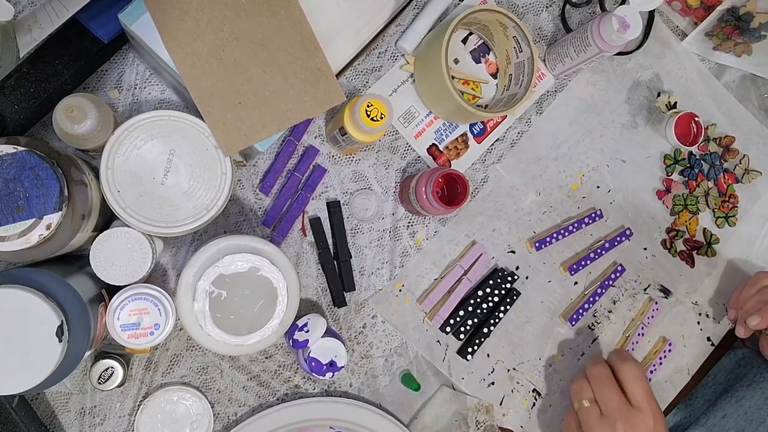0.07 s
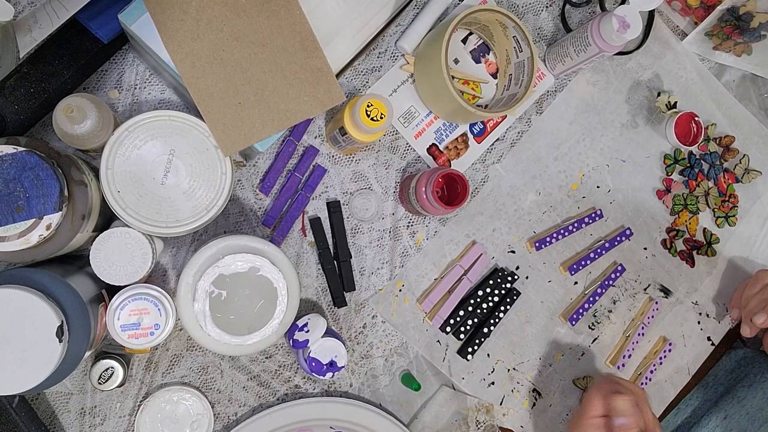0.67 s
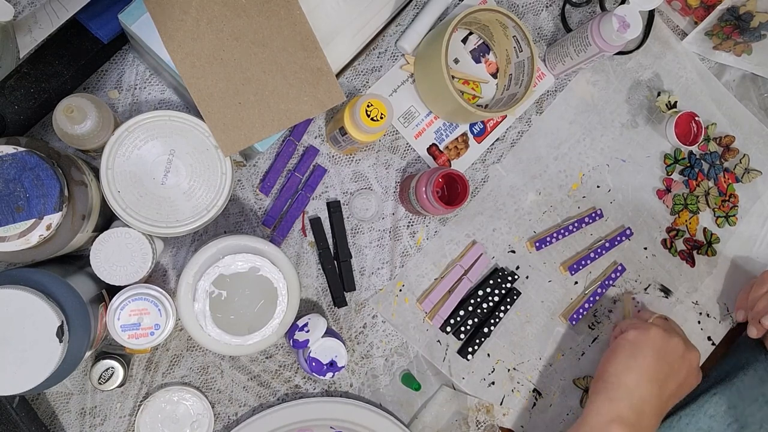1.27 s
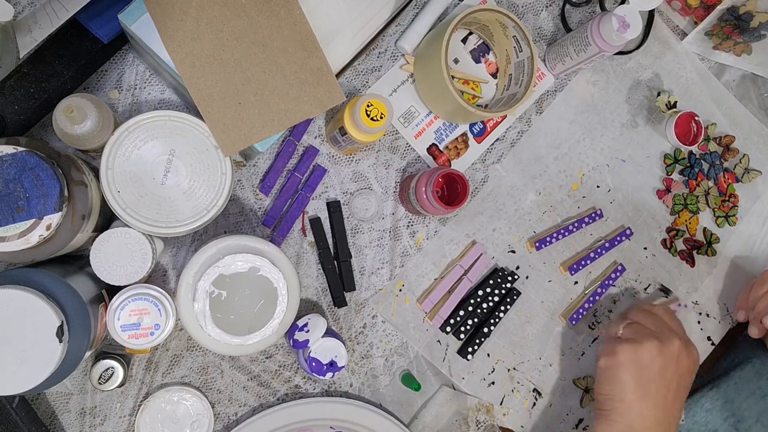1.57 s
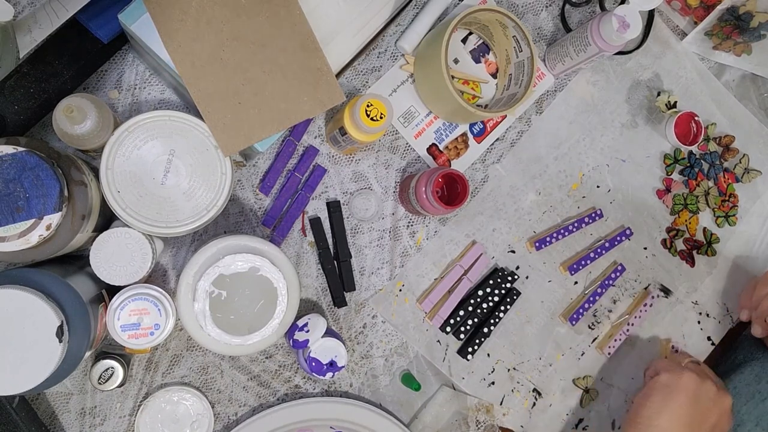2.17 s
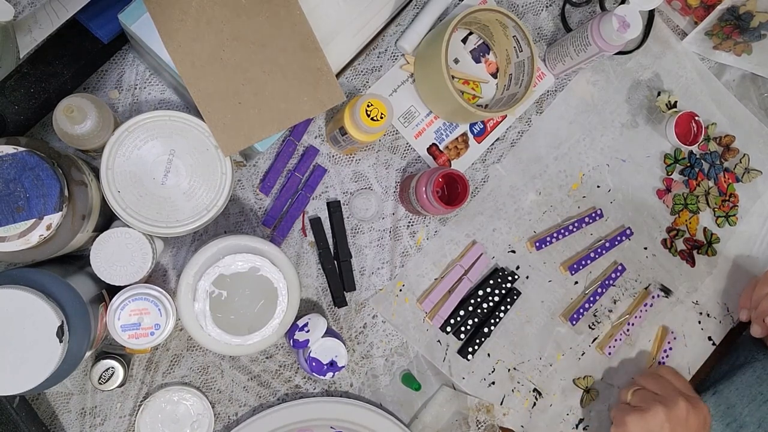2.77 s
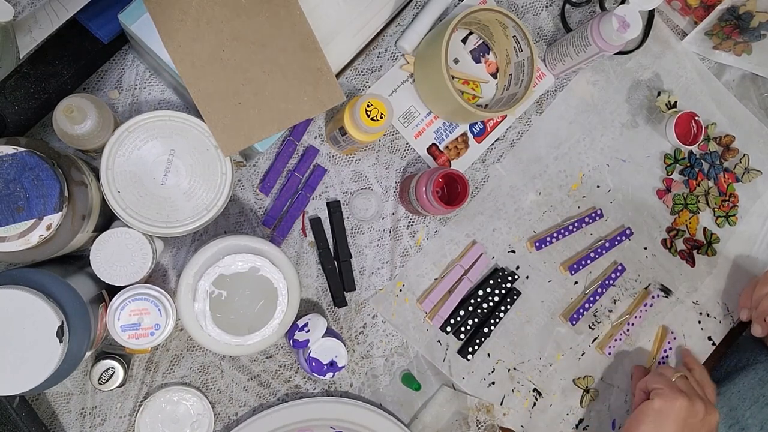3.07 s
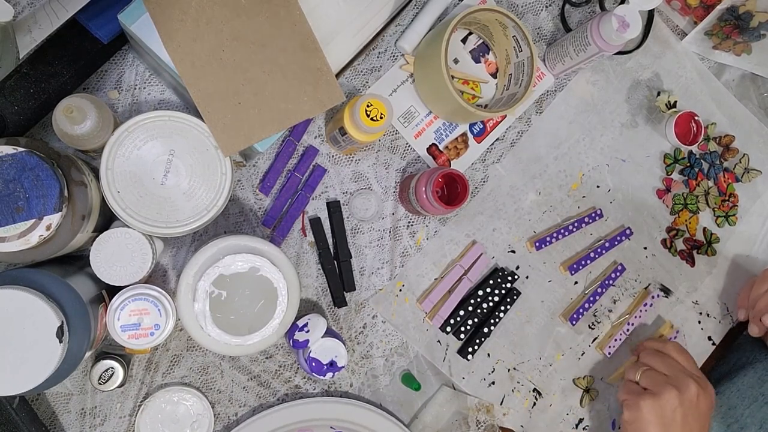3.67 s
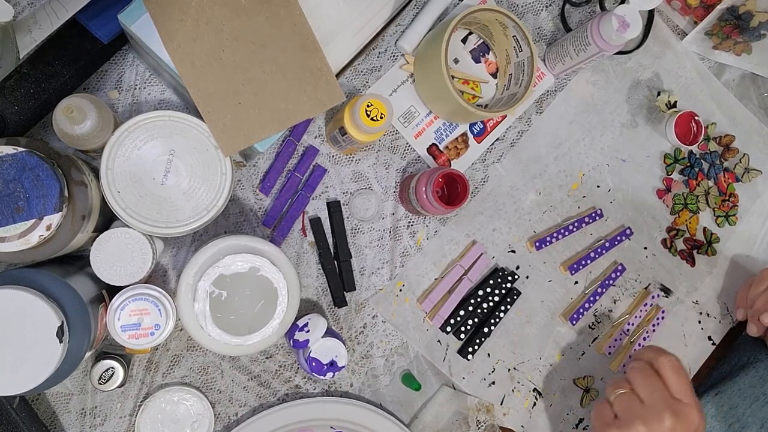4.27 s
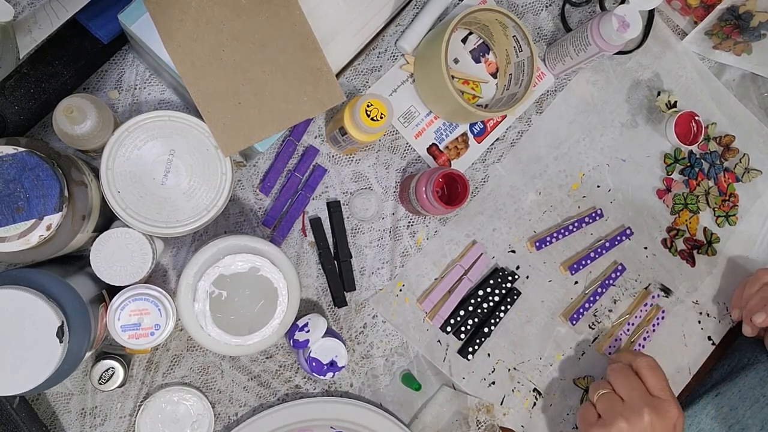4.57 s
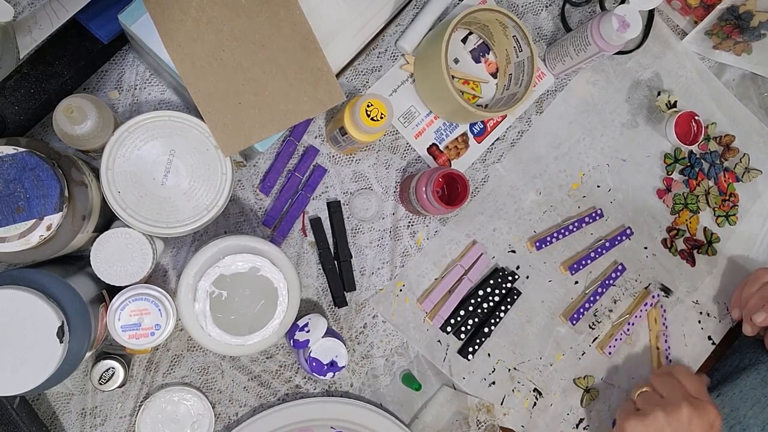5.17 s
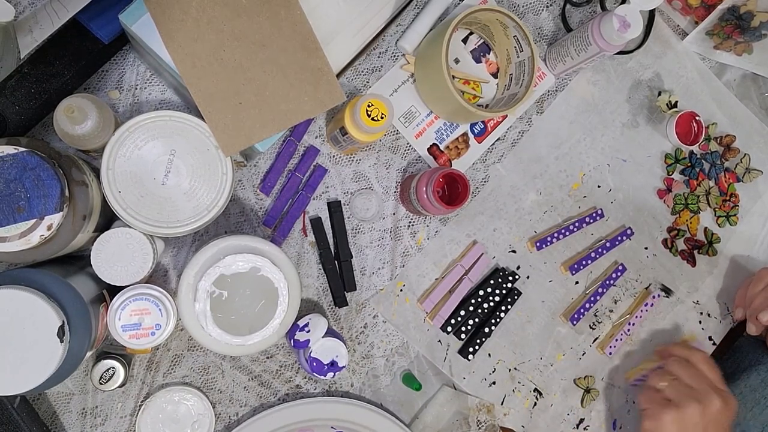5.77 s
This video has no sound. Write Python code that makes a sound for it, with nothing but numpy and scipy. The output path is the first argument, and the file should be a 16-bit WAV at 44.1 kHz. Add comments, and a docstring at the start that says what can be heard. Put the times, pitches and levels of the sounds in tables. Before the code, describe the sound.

Wooden clothespins click and slide on paper over a low hum, while a door further off knocks and then latches shut.

```python
"""A wooden clothespin slides over paper and clicks down on a craft table, above a small room's mains hum.
Friction makes the hiss of pins and fingertips, impact makes the clicks, and a hand bumps the table top.
Further off a door shudders, knocks against its frame and later shuts with a latch, each blow exciting
damped modes of the wood. Something squeals faintly, perhaps a far dog."""
import sys
import numpy as np
from scipy import signal
from scipy.fft import rfft, irfft, next_fast_len
from scipy.io import wavfile
from scipy.ndimage import uniform_filter1d, map_coordinates

SR = 44100
rng = np.random.default_rng(int(sys.argv[2]) if len(sys.argv) > 2 else 0)


def persist_wave(psi):
    """Save psi, clipped to +-1, as 16-bit WAV."""
    counts = np.round(np.clip(psi, -1, 1) * 32767).astype(np.int16)
    wavfile.write(sys.argv[1], SR, np.atleast_2d(counts).T)


N = 264820

# The room's diffuse field. Each row: frequency in Hz, left-right coherence.
COHERENCE = [(60, 0.82), (130, 0.64), (300, 0.78), (640, 0.38), (1400, 0.073), (3100, 0.033), (15000, 0.03)]
# Reverberation time. Each row: frequency in Hz, t60 in seconds.
ROOM_T60 = [(100, 0.57), (250, 0.54), (600, 0.46), (2000, 0.33), (6000, 0.28), (14000, 0.38)]

# Spectral envelopes of the sources. Each row: frequency in Hz, gain in dB.
AIR_SPECTRUM = [(20, -15), (50, 1), (75, -2.5), (105, -1.5), (160, -18), (250, -15), (480, -17), (900, -20),
                (1500, -24.5), (1900, -22), (2300, -26.5), (3800, -27.5), (4800, -36.5), (7400, -33.5),
                (8800, -47.5), (15500, -41.5)]
SQUEAL_SPECTRUM = [(300, -31), (480, 10.5), (700, -1.5), (950, 8.5), (1300, -2.5), (1520, 2.5),
                   (1800, -15.5), (2000, -14), (2800, -14), (4000, -39)]
HINGE_SPECTRUM = [(2000, -32), (3000, -3), (3400, 2), (4100, -4), (5200, -18), (7000, -38)]
DOOR_SPECTRUM = [(76, -24), (130, 0), (180, -9), (250, 1), (350, -1.5), (420, -7.5), (500, -4), (700, -8.5),
                 (1160, -11), (1900, -16), (4120, -30), (5900, -32), (9000, -52.5), (15000, -67)]
WOOD_SPECTRUM = [(50, -17), (110, 1.5), (200, -2), (270, 5.5), (520, 6), (720, -2.5), (1100, -6),
                 (1650, -7.5), (2100, -13), (3000, -20.5), (4000, -22.5), (5000, -26), (7500, -34.5),
                 (15000, -50.5)]  # door frame and table top
SKIN_SPECTRUM = [(300, -7), (800, -3), (1200, -15), (1750, 5), (2400, -15), (3300, -12), (5000, -38)]
PAPER_SPECTRUM = [(880, -41), (1500, -20), (1790, -15.5), (2160, -18), (3360, -9), (3630, -19.5),
                  (3960, -3), (4680, -16.5), (5120, -5.5), (5650, -1.5), (7140, -0.5), (9130, -15.5),
                  (12600, -7), (15100, -10), (15700, -11)]
PIN_SPECTRUM = [(300, -34), (1200, -14), (2800, -7.5), (3900, -0.5), (4700, -10), (5700, -4.5), (7400, 0),
                (8800, -18.5), (12500, -5.5), (15700, -15)]

# Normal modes of the wood. Each row: frequency in Hz, relative level in dB, t60 in seconds.
DOOR_LEAF_MODES = [(240, -6, 0.23), (316, 0, 0.22), (370, -6, 0.27), (490.5, 3.5, 0.35), (567, -7, 0.24),
                   (813, -20, 0.33), (907, -11, 0.27), (1144, -4.5, 0.2), (1258, -33, .2)]
FRAME_MODES = [(70, -4, .45), (240, -11, .45), (275, -9, .4), (348, -4, .36), (405, -8, .35), (567, 1, .4),
               (826, -2, .22), (1185, -8, .18), (1306, -4, .17), (1475, -13, .25), (1820, -9, .13),
               (1950, -9, .13), (2063, -9, .14), (2480, -18, .18)]
TABLE_TOP_MODES = [(284.4, 5.5, 0.14), (331, 0, 0.36), (520, -20, 0.12), (920, -22, 0.37), (1960, -11, .12)]

# Sustained sounds. Each row: start in seconds, length in seconds, level in dB.
LOW_RUMBLES = [(1.25, 0.038, -57), (1.38, 0.084, -53.5), (1.69, 0.16, -56.5)]  # brief low rumbles as a hand presses on the table
DOOR_SHUDDERS = [(1.606, .12, -49.5), (1.725, 0.045, -45), (1.812, 0.063, -43), (1.915, 0.061, -47)]
HINGE_RASPS = [(2.47, 0.022, -64.5), (2.61, 0.1, -80)]
FINGER_RUBS = [(4.36, 0.17, -80.5), (4.58, 0.39, -89.5)]

# Blows on wood. Each row: time in seconds, level in dB, then low, middle and treble in dB relative to it.
DOOR_KNOCKS = [(1.615, -43, -25.5, -25, -24), (1.742, -44.5, -7, -21, -36),
               (1.811, -46.5, -9.5, -23.5, -26), (2.174, -20.5, -14.5, -20, -24),
               (2.41, -35.5, -11, -21.5, -29.5), (2.51, -39.5, -10, -22, -31)]
HAND_BUMPS = [(4.487, -52, -8.5, -18.5, -38), (5.483, -62.5, -0.5, -16.5, -31)]
# The door shuts, then its bolt slides home. Each row: as for the blows above, then rise in seconds.
LATCH_BLOWS = [(3.803, -21.5, -16, -11.5, -29.5, 0.0066), (3.937, -36, -15, -18, -13.5, 0.016)]

# Faint squeals. Each row: start and length in seconds, first and last pitch in Hz, level in dB.
SQUEALS = [(1.158, 0.0384, 590, 508, -64), (1.25, 0.076, 652, 792, -67.5), (1.39, 0.029, 679, 641, -49.5),
           (1.454, 0.084, 683, 787, -76)]
# Hinge and latch metal ringing. Each row: start in seconds, frequency in Hz, level in dB, t60 in seconds.
METAL_PINGS = [(1.9, 4450, -79, .5), (2.3, 2450, -61, .16), (2.69, 3250, -73, .3), (2.715, 1220, -69, .16),
               (3.808, 5534, -53, .11), (3.815, 5841, -55, .17), (3.945, 8520, -65, .2)]
# Fingers and pins sliding on paper. Each row: start, speed-up and slow-down in seconds, peak level in dB.
PAPER_STROKES = [(0.03, 0.048, 0.013, -56), (1.292, 0.061, 0.058, -51), (1.384, 0.023, 0.13, -57),
                 (3.208, 0.13, 0.042, -54.5), (5.01, 0.14, .1, -72), (5.544, 0.11, 0.066, -56.5)]
# Clothespin contacts. Each row: time in seconds, level in dB, low band in relative dB, t60 in seconds.
PIN_CONTACTS = [(0.0754, -47, -5.5, 0.11), (0.173, -71.5, -5, 0.2), (0.4305, -74, -3.5, 0.11),
                (1.091, -74.5, -8, 0.18), (1.1596, -74, 0, 0.11), (1.2634, -51.5, -20, 0.092),
                (1.3662, -43, -0.5, 0.12), (1.723, -65.5, -14, .16), (1.7386, -62.5, -18, 0.16),
                (1.809, -58, -15.5, 0.028), (2.0413, -72, -4, 0.11), (2.2946, -62, -5.5, 0.48),
                (2.7264, -66, -6.5, 0.024), (3.058, -76, -3, .2), (3.216, -63, -7, .14),
                (3.6103, -74.5, -21, 0.088), (4.116, -71.5, -32, .094), (4.259, -73.5, -8, 0.11),
                (4.8923, -73, -21, 0.063), (4.9788, -67, -35, 0.031), (5.124, -64.5, 1.5, 0.22),
                (5.1693, -61, -1, 0.18), (5.5406, -63.5, -5, 0.32), (5.8665, -72.5, -10, 0.34)]


def amp(db):
    """Amplitude grows tenfold with every 20 dB."""
    return 10 ** (np.asarray(db) / 20)


def unit(x):
    """Dividing by the rms gives a signal unit power."""
    return x / np.sqrt(np.mean(x ** 2) + 1e-20)


def peak_rms(x, size):
    """Short-time level: the highest rms in any window of size samples."""
    return np.sqrt(np.abs(uniform_filter1d(np.mean(x ** 2, 0), size)).max() + 1e-20)


def along(points, hz):
    """Interpolation of (Hz, value) points on a logarithmic frequency axis."""
    knots_hz, values = np.transpose(points)
    return np.interp(np.log(hz + 1), np.log(knots_hz + 1), values)


def swell(rows, attack_s, t60):
    """Amplitude envelope: each event rises linearly, holds to its length and decays exponentially."""
    gain = np.zeros(N)
    for start, length_s, db in rows:
        age = np.arange(N) / SR - start
        gain += np.clip(age / attack_s, 0, 1) * amp(db - 60 * np.maximum(age - length_s, 0) / t60)
    return gain


def wobble(rate):
    """Smooth random modulation: a spline through rate Gaussian values a second."""
    return map_coordinates(rng.standard_normal(int(N * rate / SR) + 4), [np.arange(N) * rate / SR])


def filtered(x, response):
    """Linear filtering multiplies the spectrum by a frequency response."""
    length = x.shape[-1]
    padded = next_fast_len(length + SR // 8)
    return irfft(rfft(x, padded) * response(np.fft.rfftfreq(padded, 1 / SR)), padded)[..., :length]


def coloured(x, spectrum):
    """Source and filter: a body imposes its (Hz, dB) response on the excitation."""
    return filtered(x, lambda hz: amp(along(spectrum, hz)))


def split(x, edge_hz):
    """A complementary crossover: the low and high bands sum to x."""
    low = filtered(x, lambda hz: 1 / (1 + (hz / edge_hz) ** 12))
    return low, x - low


def add(track, start, sound):
    """Superposition: a sound adds to the track from start, in seconds."""
    part = track[:, max(round(start * SR), 0):][:, :sound.shape[1]]
    part += sound[:, :part.shape[1]]


def diffuse(size):
    """Diffuse-field noise: left and right are coherent in the bass and independent in the treble."""
    def mid_side_gains(hz):
        angle = np.arccos(np.clip(along(COHERENCE, hz), -1, 1)) / 2
        return np.array([np.cos(angle), np.sin(angle)])
    mid, side = filtered(rng.standard_normal((2, size)), mid_side_gains)
    return np.array([mid + side, mid - side])


def room_tail():
    """One second of reverberation, each frequency decaying exponentially at its own rate."""
    hz, t, spectra = signal.stft(diffuse(SR), SR, nperseg=256)
    decay = amp(-60 * t / along(ROOM_T60, hz)[:, None])
    return signal.istft(spectra * decay, SR, nperseg=256)[1][:, :SR]


def reverberant(x, wet_db):
    """Convolution with the room's impulse response adds reflections to the direct sound."""
    room = room_tail()
    reflections = signal.fftconvolve(np.atleast_2d(x), room / np.linalg.norm(room[0]), axes=1)[:, :N]
    return x + amp(wet_db) * reflections


def mains_hum(hum_hz=121.9, flutter_hz=118, beat_s=0.94, lull_s=4.07):
    """Three close tones interfere, giving a slow beat and a quicker flutter."""
    t = np.arange(N) / SR - lull_s
    tone = lambda hz: np.sin(2 * np.pi * hz * t + 0.15 * wobble(9.8))
    beating = tone(hum_hz) - amp(-7) * tone(hum_hz - 1 / beat_s)
    return np.sqrt(2) * amp(-65.5) * (beating - amp(-7.5) * tone(flutter_hz))


def background(whine_hz=10013):
    """Superposition of hum, electrical whine, room air and low rumbles as a hand presses on the table."""
    whine = np.sqrt(2) * amp(-100) * np.sin(2 * np.pi * whine_hz * np.arange(N) / SR)
    air = amp(-69) * unit(coloured(diffuse(N), AIR_SPECTRUM)) * amp(1.8 * wobble(2.86))
    low_noise, _ = split(diffuse(N), edge_hz=60)
    rumbles = swell(LOW_RUMBLES, attack_s=0.021, t60=0.38) * unit(low_noise)
    return mains_hum() + whine + air + rumbles


def squeals(jitter=0.07):
    """Five gliding harmonics, roughened by jitter and shimmer, pass through nasal formants."""
    glides = []
    for start, length_s, first_hz, last_hz, _ in SQUEALS:
        glides += [(start, first_hz), (start + length_s, last_hz)]
    pitch = np.interp(np.arange(N) / SR, *np.transpose(glides)) * (1 + jitter * wobble(260))
    phase = 2 * np.pi * np.cumsum(pitch) / SR
    buzz = np.sin(np.outer(np.arange(1, 6), phase)).sum(0) * amp(3 * wobble(200))
    effort = swell([(start, length_s, db) for start, length_s, *_, db in SQUEALS], 0.015, t60=0.11)
    return reverberant(unit(coloured(buzz, SQUEAL_SPECTRUM)) * effort, wet_db=-2)


def blows(rows, spectrum, modes, thud_t60, room_db, ring_db):
    """Impact on wood excites a noisy thud and damped modes; three bands are then levelled separately."""
    out, t = np.zeros((2, N)), np.arange(SR) / SR
    hardest_db = max(row[1] for row in rows)
    for time, level_db, low_db, middle_db, treble_db, rise_s in rows:
        thud = coloured(diffuse(SR) * amp(-60 * t / thud_t60) + amp(room_db) * room_tail(), spectrum)
        ring = 0
        for hz, db, t60 in modes:
            spread = np.clip(1 - along(COHERENCE, hz), 0, 1)  # high modes differ more from left to right
            phase = rng.uniform(0, 2 * np.pi) + rng.standard_normal((2, 1)) * spread
            ring += amp(db + rng.normal(0, 0.73) - 60 * t / t60) * np.sin(2 * np.pi * hz * t + phase)
        contact = np.minimum(t / (2 * rise_s), 1) ** 2  # the surfaces graze before they meet fully
        ring_gain = amp(ring_db + 0.39 * (level_db - hardest_db))  # light blows ring less
        blow = (thud / peak_rms(thud, 1024) + ring_gain * ring) * contact
        low, rest = split(blow, edge_hz=685)
        middle, treble = split(rest, edge_hz=2260)
        bands = (low, low_db), (middle, middle_db), (treble, treble_db)
        add(out, time - rise_s, sum(amp(level_db + db) * band / peak_rms(band, 1024) for band, db in bands))
    return out


def hinge_rasp():
    """Friction in the hinge gives a band of noise with rapid, irregular amplitude modulation."""
    friction = coloured(diffuse(N) * amp(2.1 * wobble(120)), HINGE_SPECTRUM)
    return swell(HINGE_RASPS, attack_s=0.012, t60=0.41) * unit(friction)


def metal_pings(rise_s=0.0018):
    """Small metal parts ring as damped oscillators; phase modulation makes the tone unsteady."""
    out, t = np.zeros(N), np.arange(N) / SR
    for start, hz, db, t60 in METAL_PINGS:
        age = np.maximum(t - start, 0)
        tone = np.sin(2 * np.pi * hz * age + 1.1 * wobble(350))
        out += amp(db - 60 * age / t60) * (1 - np.exp(-age / rise_s)) * tone
    return reverberant(out, wet_db=-6)


def door_panel(shudder_hz=80, boom_hz=78, boom_t60=0.55, rise_s=0.013):
    """The panel's lowest mode shudders as the door moves and decays freely after each knock."""
    t = np.arange(N) / SR
    shudder = np.sin(2 * np.pi * shudder_hz * t + 0.61 * wobble(12))
    out = np.sqrt(2) * swell(DOOR_SHUDDERS, attack_s=0.036, t60=0.2) * shudder
    for start, knock_db, *_ in DOOR_KNOCKS:
        age = np.maximum(t - start, 0)
        boom = amp(knock_db - 8.5 - 60 * age / boom_t60) * (1 - np.exp(-age / rise_s))
        out += boom * np.sin(2 * np.pi * boom_hz * age)
    return out


def door(knock_rise_s=0.004):
    """Impacts set door and frame vibrating; a level difference places them a little to the right."""
    rows = [(*row, knock_rise_s) for row in DOOR_KNOCKS]
    knocks = blows(rows, DOOR_SPECTRUM, DOOR_LEAF_MODES, thud_t60=0.18, room_db=-7.5, ring_db=-4.5)
    latch = blows(LATCH_BLOWS, WOOD_SPECTRUM, FRAME_MODES, thud_t60=0.14, room_db=-13, ring_db=-8.5)
    return (knocks + latch + hinge_rasp() + metal_pings() + door_panel()) * amp([[-1], [1]])


def table_bumps(rise_s=0.009):
    """The soft impact of a hand excites the hollow resonance of the table top."""
    rows = [(*row, rise_s) for row in HAND_BUMPS]
    return blows(rows, WOOD_SPECTRUM, TABLE_TOP_MODES, thud_t60=0.081, room_db=-7.5, ring_db=7)


def finger_rubs():
    """Sliding friction of skin along a wooden pin gives soft, uneven noise."""
    friction = coloured(diffuse(N) * amp(2.7 * wobble(60)), SKIN_SPECTRUM)
    return swell(FINGER_RUBS, attack_s=0.02, t60=0.34) * unit(friction)


def paper_slides(touch_s=0.007, start_db=-18, stop_db=-19.5):
    """Stick-slip friction: paper fibres catch and let go, and fizz grows faster with speed than hiss."""
    grain = amp(2.6 * wobble(1100) + 1.5 * wobble(130))
    hiss, fizz = map(unit, split(coloured(diffuse(N) * grain, PAPER_SPECTRUM), edge_hz=10800))
    out = np.zeros((2, N))
    for start, rise_s, fall_s, db in PAPER_STROKES:
        age = np.arange(N) / SR - start
        early = np.clip(1 - age / rise_s, 0, 1)
        late = np.maximum(age - rise_s, 0) / fall_s
        speed = np.clip(age / touch_s, 0, 1) * amp(start_db * early ** 2 + stop_db * late ** 2)
        out += amp(db) * (speed * hiss + amp(-9) * speed ** 1.3 * fizz)
    return reverberant(out, wet_db=-14)


def clothespin_clicks(snap_t60=0.0089, room_db=-18):
    """Impact transients of wood on paper: light contacts swell into a scuff, hard ones open with a snap."""
    out, t = np.zeros((2, N)), np.arange(SR) / SR
    hardest_db = max(row[1] for row in PIN_CONTACTS)
    for time, level_db, low_db, t60 in PIN_CONTACTS:
        softness_db = hardest_db - level_db
        rise_s = 0.0003 + 0.0004 * softness_db
        onset = np.minimum(t / rise_s, 1)
        snap = amp(18 - 1.5 * softness_db - 60 * t / snap_t60)
        scuff = amp(-60 * t / t60) * onset
        room = amp(room_db) * room_tail() * onset
        contact = coloured(diffuse(SR) * (snap + scuff) + room, PIN_SPECTRUM)
        low, rest = split(contact, edge_hz=4850)
        body, top = split(rest, edge_hz=9200)
        top_db = -21 + 0.3267 * softness_db  # lighter contacts sound thinner
        bands = (low, low_db), (body, 0), (top, top_db)
        click = sum(amp(level_db + db) * band / peak_rms(band, 128) for band, db in bands)
        add(out, time - rise_s / 2, click)
    return out


def scene():
    """The sound pressures of independent sources add linearly."""
    distant = background() + squeals() + door()
    return distant + table_bumps() + finger_rubs() + paper_slides() + clothespin_clicks()


def record(dry, cutoff_hz=15780):
    """An ideal low-pass filter limits the bandwidth."""
    return filtered(dry, lambda hz: hz < cutoff_hz)


dry = scene()
out = record(dry)
persist_wave(out)
```